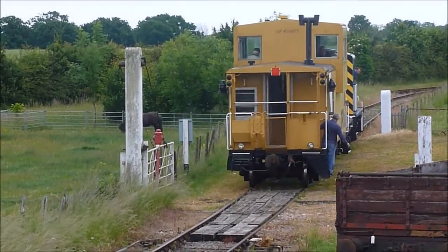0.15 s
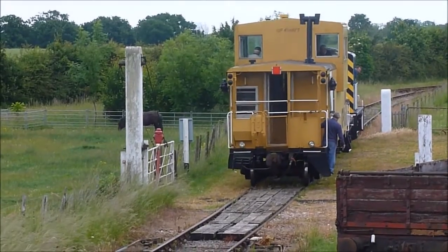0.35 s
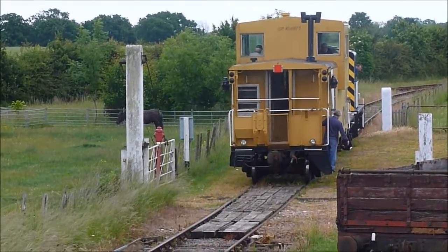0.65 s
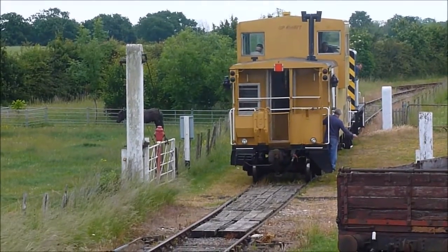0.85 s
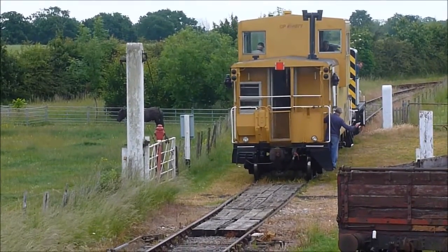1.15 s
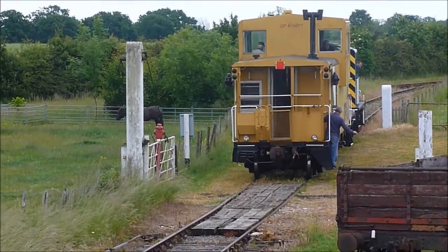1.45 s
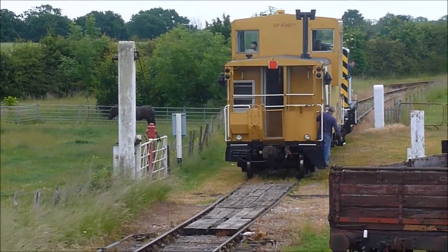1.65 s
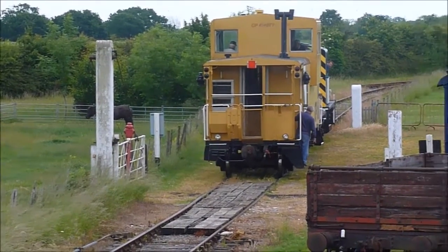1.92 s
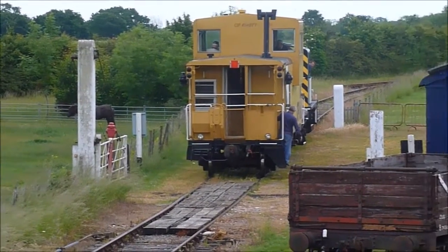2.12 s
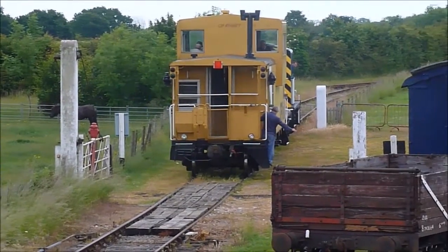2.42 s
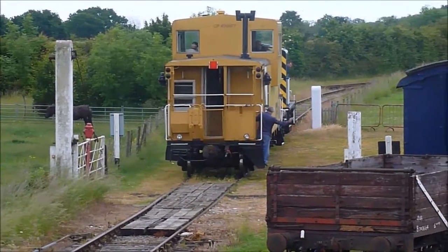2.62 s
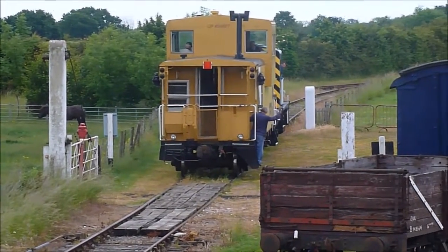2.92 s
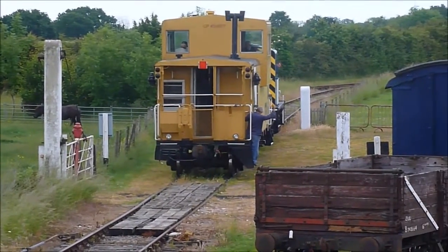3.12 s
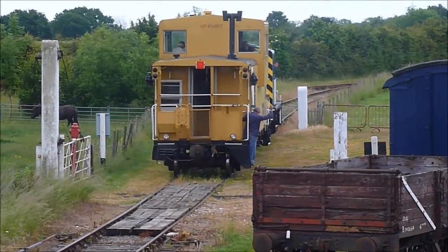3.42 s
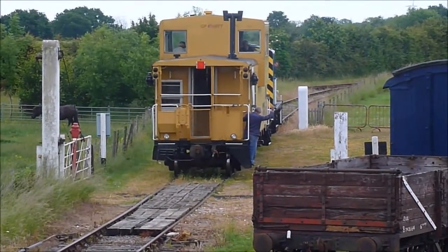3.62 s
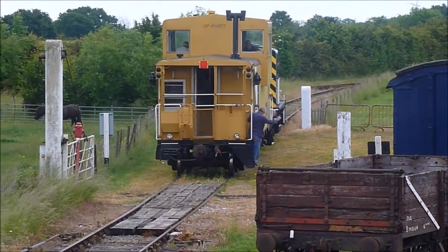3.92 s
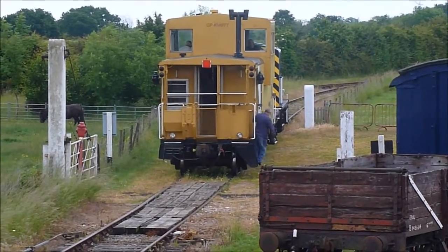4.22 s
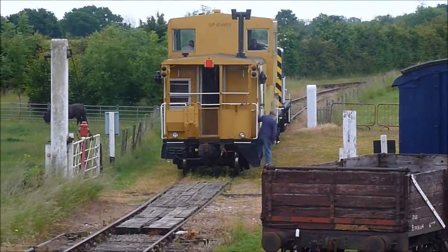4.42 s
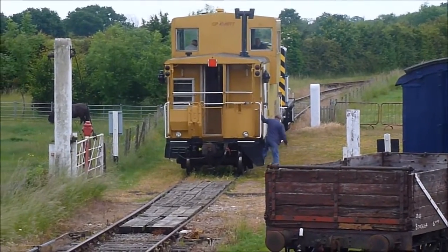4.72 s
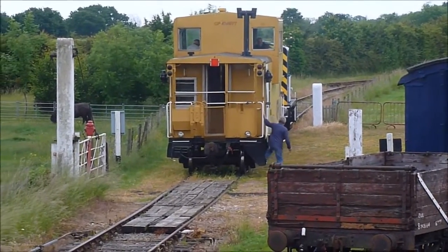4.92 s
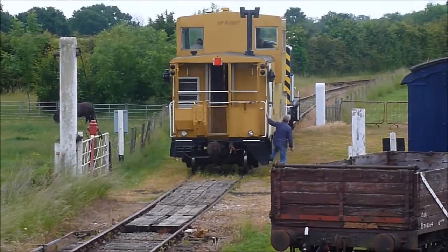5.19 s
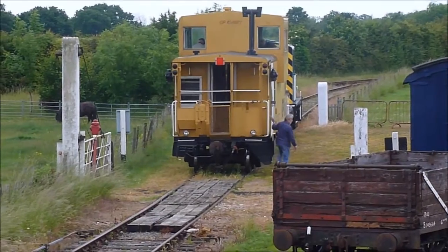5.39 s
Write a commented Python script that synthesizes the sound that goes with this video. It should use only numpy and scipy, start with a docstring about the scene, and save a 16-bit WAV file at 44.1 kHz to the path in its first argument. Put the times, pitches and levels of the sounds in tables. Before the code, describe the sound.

Air bursts from a stationary diesel locomotive's brake after faint puffs and a click, hissing loudly and slowly mellowing.

```python
"""A standing diesel locomotive vents its air brake outdoors. After a few soft spits of air and clicks of
the handle, the cock cracks open, a blast rings the brake pipe, and a jet of air roars through the hose.
The hiss starts bright and mellows as the pressure falls, while the cock's edge whistles in the jet.
Steel and track throw back close echoes. Behind it lie a few faint, short hoots and a low rumble."""
import sys
import numpy as np
from scipy import signal
from scipy.fft import rfft, irfft, next_fast_len
from scipy.io import wavfile
from scipy.ndimage import uniform_filter1d, map_coordinates

SR = 44100
rng = np.random.default_rng(int(sys.argv[2]) if len(sys.argv) > 2 else 0)


def to_wav(s):
    """Save 16-bit WAV."""
    ch = np.atleast_2d(s).T  # columns
    pcm = np.round(np.clip(ch, -1, 1) * 32767)  # PCM
    wavfile.write(sys.argv[1], SR, pcm.astype(np.int16))


N = 244755

# Broad colour of the escaping air. Each row: frequency in Hz, relative level in dB.
AIR_COLOUR = [(60, -65), (250, -23.5), (400, -21), (480, -11), (1000, -5), (2000, -7.5), (3300, -1),
              (4200, -9), (5300, -11.5), (6300, -17.5), (7000, -24), (7650, -46), (8200, -78.5)]
# Peaks and notches of the hose and nearby steel. Each row: centre in Hz, width in Hz, gain in dB.
HOSE_RESONANCES = [(470.3, 22, 11), (513, 65, 7.5), (606, 65, -17.5), (679, 43, 10), (747, 28, 6.5),
                   (940, 24, 7.5), (1123, 55, -19.5), (1288, 166, 3.5), (1418, 45, 8), (1603, 29, -7.5),
                   (1621, 32, 10.5), (1687, 37, 7), (1830, 48, 7.5), (1927, 55, 9), (2254, 100, 7),
                   (2409, 42, 8.5), (2524, 66, 8), (2540, 15, 4.5), (2802, 190, 4.0), (2913, 39, 3),
                   (3060, 81, -4), (3450, 49, 5.5), (3784, 55, 6.5), (3924, 91, 5), (4470, 47, 6),
                   (4890, 290, 5.5), (5396, 350, 6), (5560, 80, -5.5), (5860, 180, 6), (6360, 120, 6.5)]
# Flow through the open cock, swelling once as the pipe drains. Each row: time in seconds, gain in dB.
AIR_FLOW = [(1.72, -28), (2.15, -28), (2.42, -27), (2.7, -27.5), (3.1, -28.5), (3.5, -28.5), (5.5, -29.5)]
# Flares of the whistle. Each row: time of the peak in seconds, level in dB.
WHISTLE_FLARES = [(2.12, -36), (3.59, -32.5), (4.689, -36.5), (5.385, -37.5)]
# Resonances of the barely open cock. Each row: centre in Hz, width in Hz, relative level in dB.
SLIT_RESONANCES = [(710, 21, -8.5), (1004, 31, -9), (1450, 36, -3), (2270, 77, -15), (2726, 31, 1),
                   (3350, 36, -3), (4690, 27, -23)]
# Pipe modes rung by the blast. Each row: frequency in Hz, level in dB, 60 dB decay time in seconds.
PIPE_MODES = [(484, -39, 0.17), (700, -37, 0.13), (1360, -26.5, 0.16), (1610, -33, .1), (1980, -33.5, .1),
              (2330, -38, .08), (2900, -23, .1), (3030, -24, .1), (3730, -28, .07), (3750, -36, .07),
              (5050, -23, .08), (5400, -32, 0.072), (6100, -37, .12), (6200, -31.5, .15),
              (6670, -34.5, 0.102)]
# Soft spits of air. Each row: start, hold and 60 dB decay time in seconds, level in dB,
# centre in Hz, width in octaves.
AIR_SPITS = [(0.023, 0.17, .75, -45, 3680, 0.42), (0.083, 0.12, 0.72, -47.5, 1800, 1),
             (0.289, 0.035, 0.21, -41.5, 2000, 0.63), (0.462, 0.027, 0.72, -48, 2520, .2),
             (1.056, 0.055, .4, -52, 1680, 0.7), (1.619, 0.054, .05, -38.5, 3080, .8)]
# Contacts of the handle. Each row: start in seconds, level in dB, brightness in dB per octave.
HANDLE_CONTACTS = [(1.146, -48, 10), (1.1767, -16.5, -14), (1.1782, -35, 6.5), (1.182, -29, -12)]
# Modes of the handle. Each row: frequency in Hz, relative level in dB, 60 dB decay time in seconds.
HANDLE_MODES = [(1190, -0.5, 0.0064), (3350, -1.5, .004), (5100, -8, .002)]
# Distant hoots. Each row: start in seconds, twice the hold time in seconds, level in dB.
DISTANT_HOOTS = [(0.19, 0.037, -39.5), (0.385, .04, -48), (0.565, .04, -48.5), (0.946, .056, -42),
                 (0.993, 0.087, -47), (1.407, .02, -50)]
# Colour of the outdoor rumble. Each row: frequency in Hz, relative level in dB.
RUMBLE_COLOUR = [(25, -31.5), (55, -26.5), (100, -15.5), (140, -5.5), (200, -7.5), (310, 0), (400, -4.5),
                 (500, -2), (1030, -3), (1500, -8), (3400, -14), (6400, -27), (7300, -41.5), (8000, -66.5)]

OPEN_S, OPEN_RISE_S = 1.678, .01  # the cock opens at one stroke


def air_jet(surge_db=9, drain_s=0.85, edge_start_hz=4030, edge_end_hz=1360, sink_s=0.64):
    """Turbulent jet: pressure lifts the treble above an edge; lift and edge sink as the pipe drains."""
    hz, frame_s, spectrum = signal.stft(noise(hose_colour), SR, nperseg=256)
    age = np.maximum(frame_s - OPEN_S, 0)
    lift_db = surge_db * np.exp(-age / drain_s)
    edge_hz = edge_end_hz + (edge_start_hz - edge_end_hz) * np.exp(-age / sink_s)
    ratio = (hz[:, None] / edge_hz) ** 2
    treble_shelf = ratio / np.sqrt((1 - ratio) ** 2 + 0.79 * ratio)  # damped to a slight hump
    # eddies let patches of the spectrum swell on their own
    eddies = uniform_filter1d(rng.standard_normal(spectrum.shape), size=3, axis=0)
    eddies = uniform_filter1d(eddies, size=18, axis=1)
    gain = amp(lift_db * treble_shelf + 0.82 * unit(eddies))
    jet = signal.istft(spectrum * gain, SR, nperseg=256)[1][:N]
    flow_db = np.interp(clock(), *np.transpose(AIR_FLOW))
    return jet * cock_opening() * amp(flow_db)


def hose_colour(hz):
    """Tone of air leaving the hose: a broad hump carved by narrow peaks and notches."""
    carving_db = sum(db * 2 ** -(2 * (hz - centre) / width) ** 2
                     for centre, width, db in HOSE_RESONANCES)
    return amp(along(AIR_COLOUR, hz) + carving_db)


def cock_opening():
    """How far the cock is open, 0 to 1."""
    return np.clip((clock() - OPEN_S) / OPEN_RISE_S, 0, 1)


def edge_whistle(centre_hz=3495, width_hz=65, level_db=-39, waver_db=1.5, flare_s=0.026):
    """The cock's edge sings in the jet: a breathy tone that wavers and flares now and then."""
    flares = sum(amp(db) * np.exp(-.5 * ((clock() - peak) / flare_s) ** 2)
                 for peak, db in WHISTLE_FLARES)
    level = cock_opening() * amp(level_db + waver_db * wobble(8)) + flares
    return level * noise(lambda hz: 1 / (1 + ((hz - centre_hz) / width_hz) ** 2))


def opening_blast():
    """Air sings through a slit; then the full blast gives a soft thump and briefly rings the pipe."""
    slit = noise(lambda hz: resonances(SLIT_RESONANCES, hz))
    slit *= gate(1.616, rise=0.013, hold=0.057, t60=0.031)
    thump = np.sin(2 * np.pi * 70 * (clock() - 1.684)) * gate(1.684, rise=.002, hold=0.0019, t60=.03)
    ring = np.zeros(N)
    for hz, db, t60 in PIPE_MODES:
        tone = np.sin(2 * np.pi * hz * clock() + wobble(70))
        ring += amp(db) * tone * gate(1.683, rise=0.0059, hold=0.02, t60=t60)
    return amp(-33) * muffled(slit, corner_hz=5900) + amp(-48) * thump + ring


def air_spits():
    """Small escapes of air before the cock opens, each a soft puff of hiss."""
    spits = np.zeros(N)
    for start, hold, t60, db, centre_hz, octaves in AIR_SPITS:
        hiss = noise(lambda hz: np.exp(-.5 * (np.log2((hz + 1) / centre_hz) / octaves) ** 2))
        spits += amp(db) * hiss * gate(start, rise=0.022, hold=hold, t60=t60)
    return muffled(spits, corner_hz=6200)


def handle_clicks():
    """Each contact rings the handle's modes; a harder one favours the high ones."""
    lowest_hz = HANDLE_MODES[0][0]
    clicks = np.zeros(N)
    for start, db, brightness in HANDLE_CONTACTS:
        for hz, mode_db, t60 in HANDLE_MODES:
            level = amp(db + mode_db + brightness * np.log2(hz / lowest_hz))
            tone = np.sin(2 * np.pi * hz * (clock() - start))
            clicks += level * tone * gate(start, rise=0.00042, hold=.0002, t60=t60)
    return muffled(clicks, corner_hz=6500)


def close_echoes(x, level_db=-14, nearest_s=.008, farthest_s=.026, corner_hz=2800, count=10):
    """The dry sound plus a light slap of its treble off the steel and the track."""
    delays = rng.uniform(nearest_s, farthest_s, count)
    echoes = lambda hz: sum(np.exp(-2j * np.pi * hz * delay) for delay in delays) / np.sqrt(count)
    return filtered(x, lambda hz: 1 + amp(level_db) * echoes(hz) * hz / np.hypot(hz, corner_hz))


def distant_hoots(pitch_hz=1010):
    """Short, slightly unsteady tones on one pitch that fade over the field."""
    hoots = np.zeros(N)
    for start, length, db in DISTANT_HOOTS:
        tone = np.sin(2 * np.pi * pitch_hz * clock() + 0.91 * wobble(90))
        hoots += amp(db) * unit(tone) * gate(start, rise=0.012, hold=length / 2, t60=0.21)
    return hoots


def outdoor_rumble(level_db=-44.5, waver_db=1.6):
    """A bed of low rumble that wavers a little."""
    return amp(level_db + waver_db * wobble(11)) * noise(lambda hz: amp(along(RUMBLE_COLOUR, hz)))


def amp(db):
    """Decibels to gain."""
    return 10 ** (np.asarray(db) / 20)


def unit(x):
    """x scaled to rms 1."""
    return x / np.sqrt(np.mean(x ** 2) + 1e-20)


def clock():
    """The time of every sample in seconds."""
    return np.arange(N) / SR


def along(points, hz):
    """An EQ curve: (Hz, dB) points joined on a log frequency axis."""
    point_hz, db = np.transpose(points)
    return np.interp(np.log(hz + 1), np.log(point_hz + 1), db)


def wobble(rate):
    """A smooth random drift, rate knots a second."""
    return map_coordinates(rng.standard_normal(int(N * rate / SR) + 4), [clock() * rate])


def filtered(x, response):
    """x shaped by a frequency response."""
    size = next_fast_len(N + SR // 2)
    return irfft(rfft(x, size) * response(np.fft.rfftfreq(size, 1 / SR)), size)[:N]


def muffled(x, corner_hz, order=15):
    """x with its top end rolled off steeply."""
    return filtered(x, lambda hz: 1 / np.sqrt(1 + (hz / corner_hz) ** (2 * order)))


def noise(response):
    """Fresh coloured noise of rms 1."""
    return unit(filtered(rng.standard_normal(N), response))


def resonances(modes, hz):
    """Response of a bank of band-pass resonators."""
    return sum(amp(db) * 1j * hz * width / (centre ** 2 - hz ** 2 + 1j * hz * width)
               for centre, width, db in modes)


def gate(start, rise, hold, t60):
    """An envelope that opens, holds and dies away by 60 dB every t60 seconds."""
    age = clock() - start
    return np.clip(age / rise, 0, 1) * amp(-60 * np.maximum(age - hold, 0) / t60)


def scene():
    """The air brake up front and the outdoors behind it, alike in both channels."""
    brake = air_jet() + edge_whistle() + opening_blast() + air_spits() + handle_clicks()
    outdoors = distant_hoots() + outdoor_rumble()
    mono = close_echoes(brake) + outdoors
    return np.array([mono, mono])


def record(dry, low_cut_hz=60, top_hz=7750):
    """Final EQ: a low cut on the deep bass and a brick wall on the top end."""
    thinned = signal.sosfilt(signal.butter(2, low_cut_hz, "high", fs=SR, output="sos"), dry)
    return np.array([muffled(channel, top_hz, order=80) for channel in thinned])


dry = scene()
out = record(dry)
to_wav(out)
```